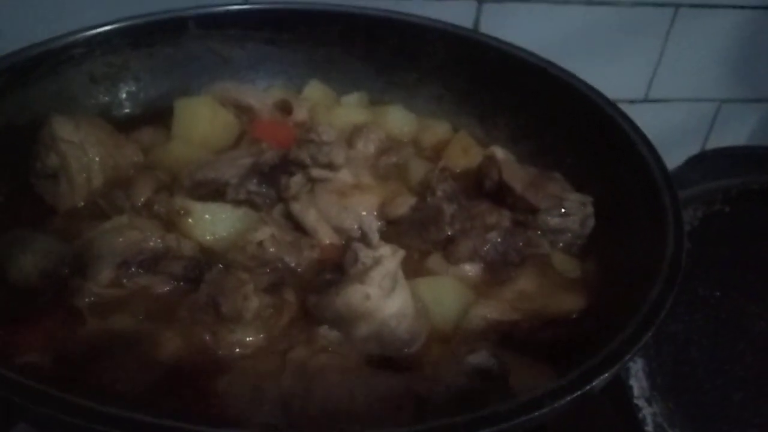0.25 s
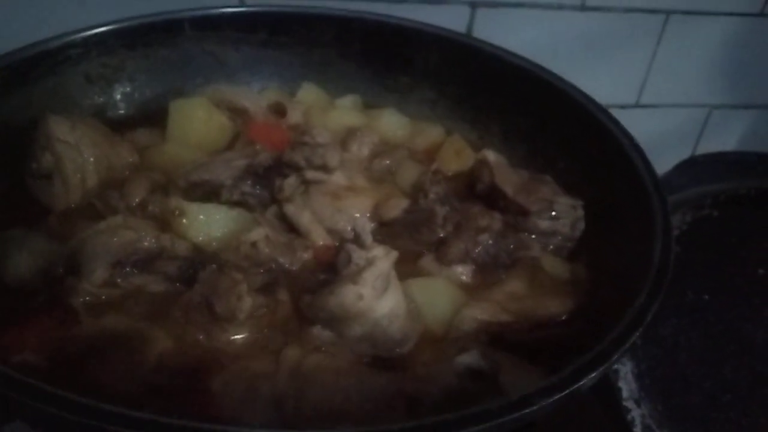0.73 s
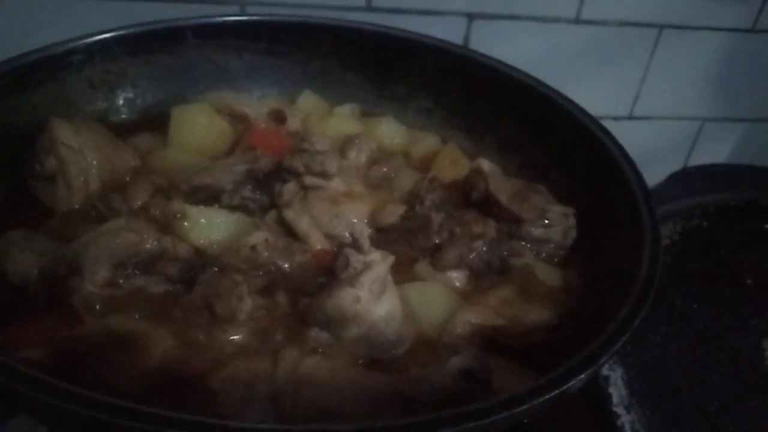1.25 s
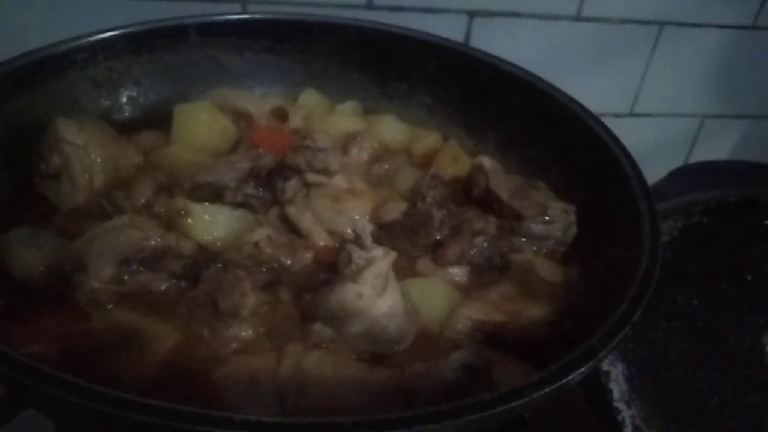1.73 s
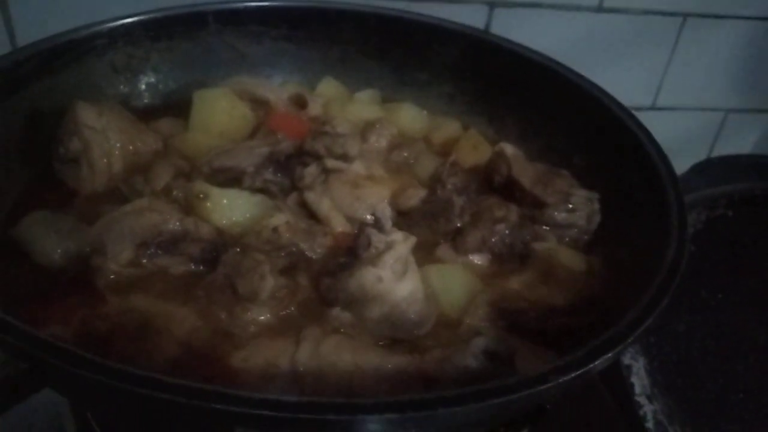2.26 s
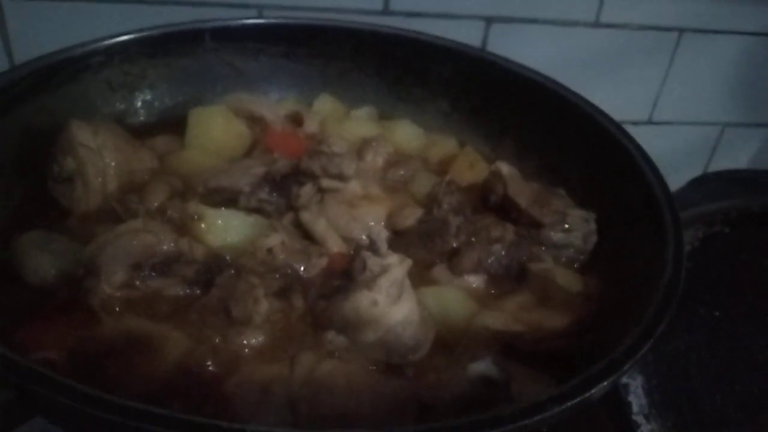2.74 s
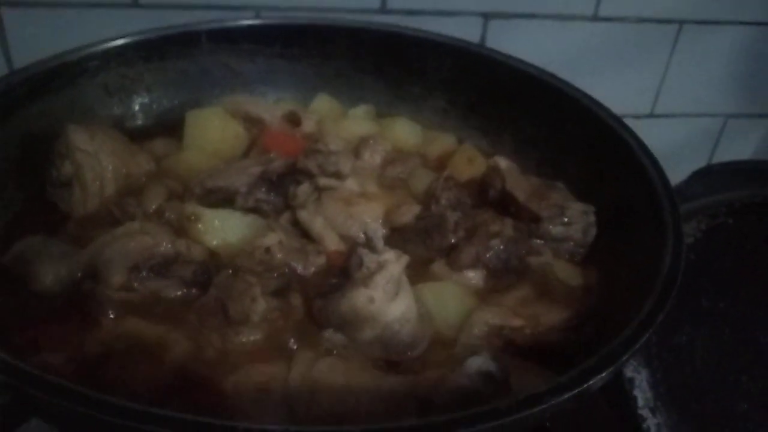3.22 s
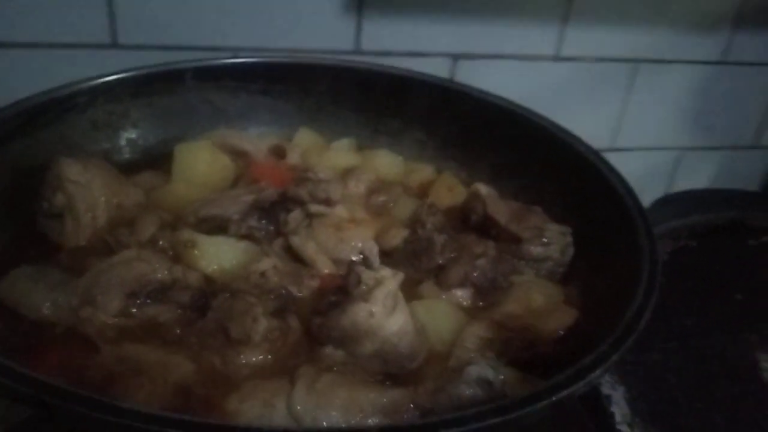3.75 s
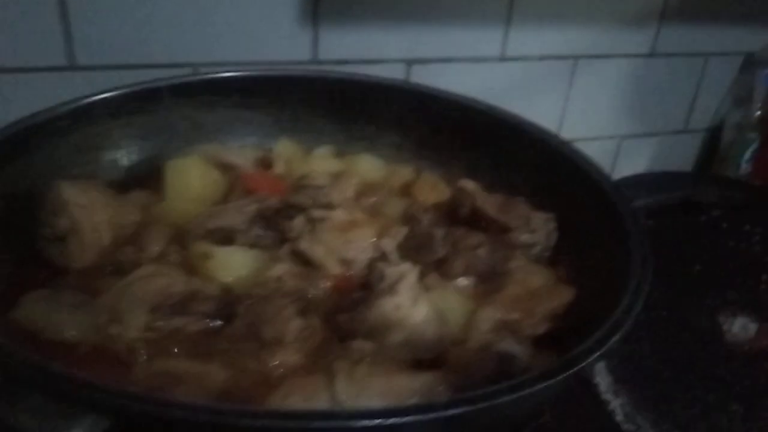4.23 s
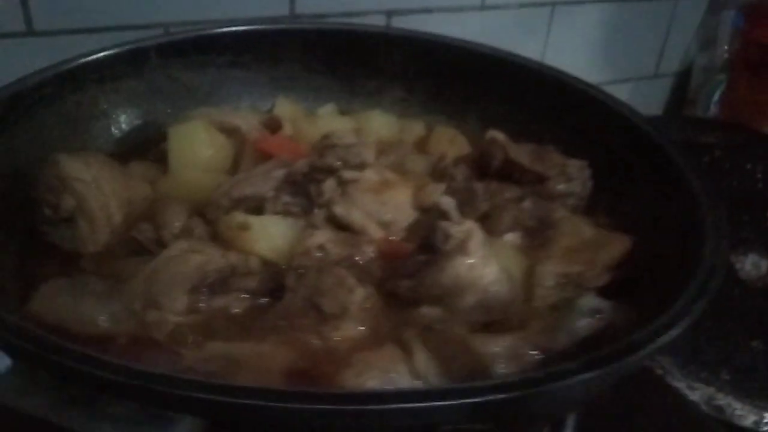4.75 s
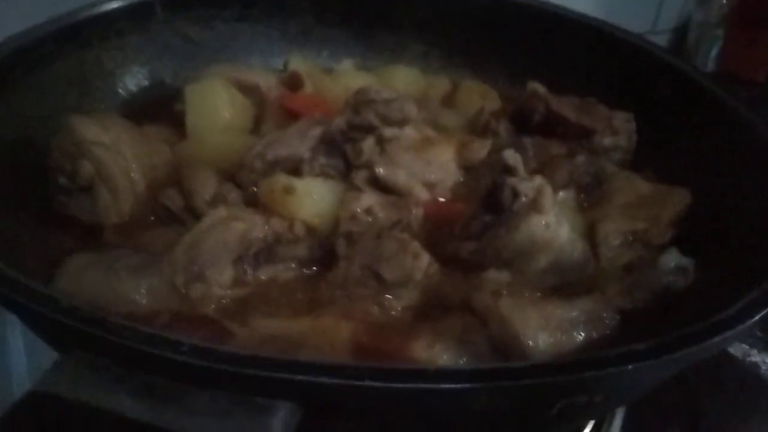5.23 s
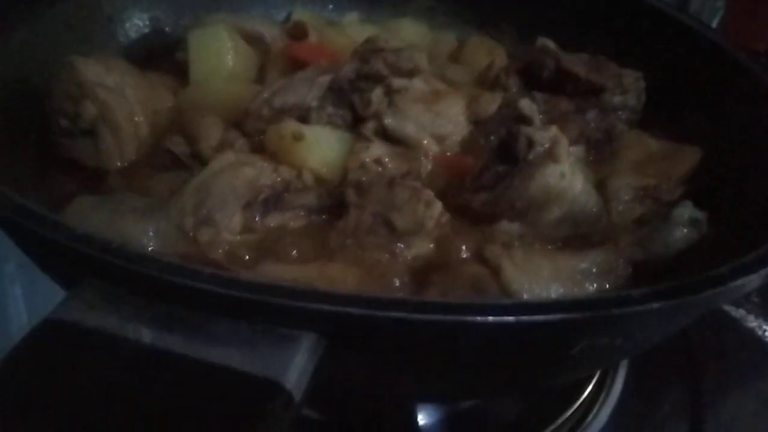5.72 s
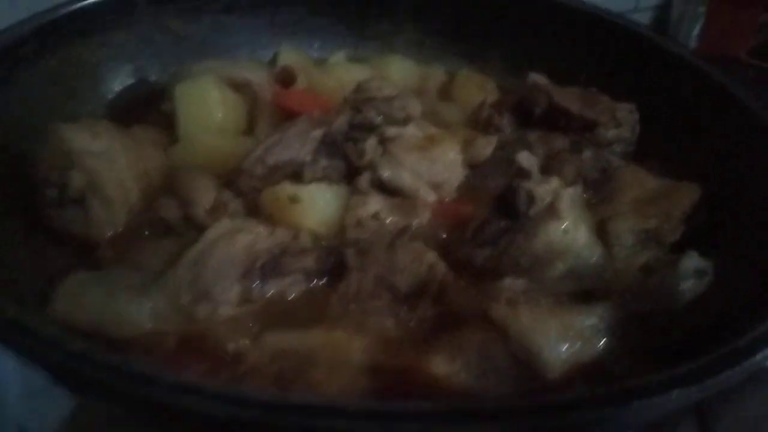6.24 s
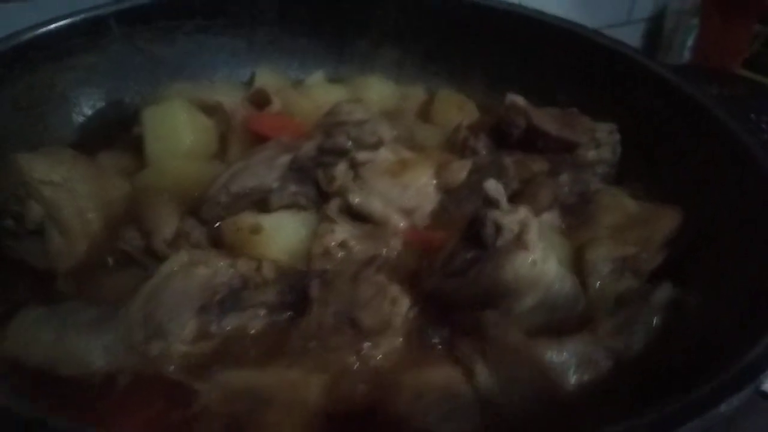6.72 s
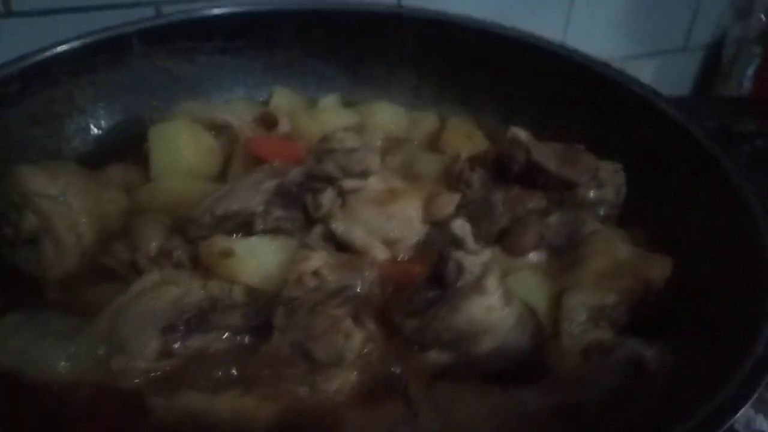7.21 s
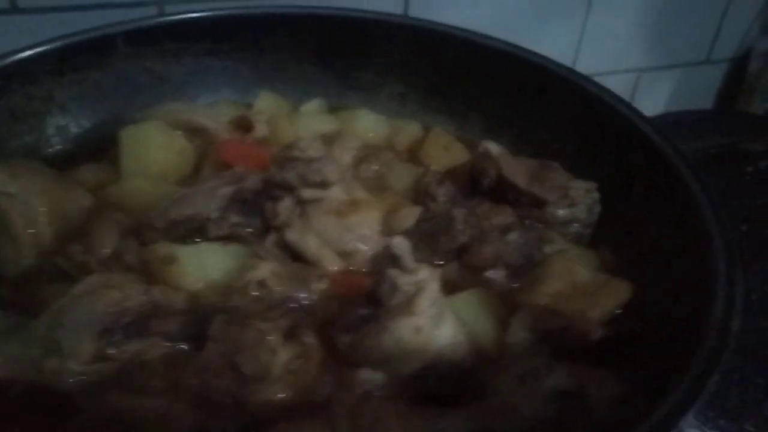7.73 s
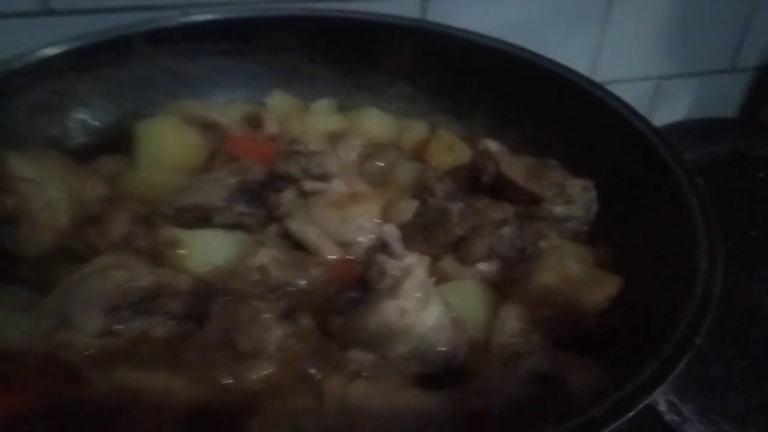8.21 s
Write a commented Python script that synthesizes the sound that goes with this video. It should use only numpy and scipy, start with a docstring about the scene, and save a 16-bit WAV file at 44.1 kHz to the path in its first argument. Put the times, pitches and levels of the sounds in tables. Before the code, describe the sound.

Close, crisp bubble pops and fine sizzling from a simmering stew; a wavering hum stops after one dry knock, and the popping grows busier.

```python
"""A stew simmers in a pan in a tiled kitchen, heard from close by.
From the start bubbles burst as short pitched pops, each with its froth, among random swarms and crackle.
A low hum wavers until just after a knock at about 2.4 s. Pops then come thicker and mostly louder.
Throughout, fat spits now and then, or sauce sizzles on the hot pan wall; late on, steam briefly whistles.
Pops are short swelling tones; hiss, hum, gurgles and whistles are shaped noise."""
import sys
import numpy as np
from scipy import signal
from scipy.fft import rfft, irfft, next_fast_len
from scipy.io import wavfile
from scipy.ndimage import uniform_filter1d

SR = 44100
rng = np.random.default_rng(int(sys.argv[2]) if len(sys.argv) > 2 else 0)


def store_wav(level_fs):
    """Save 16-bit WAV to argv[1]."""
    pcm = np.round(np.clip(np.atleast_2d(level_fs), -1, 1) * 32767)
    wavfile.write(sys.argv[1], SR, pcm.T.astype(np.int16))


N = 373527
TIME = np.arange(N) / SR  # seconds

# Bubbles that burst one by one. Each row: peak time in seconds, peak level in dB, pitch in Hz,
# time to swell to the peak in ms, froth level in dB relative to the pop before the froth's trim.
POPS = [(0.1056, -47, 735, 5.2, 0), (0.11, -47, 2310, 5.0, 5), (0.1187, -37.5, 3440, 1.2, -10),
        (0.1232, -34, 3400, 1.5, -0.5), (0.14, -36, 7800, 0.29, -13), (0.1667, -39.5, 1234, 0.94, 11),
        (0.188, -39, 1500, 2.3, -19), (0.2206, -38, 1440, 3.7, -4), (0.2555, -45.5, 1124, 11.8, 3.5),
        (0.2797, -37.5, 8940, 0.44, -3), (0.3345, -48, 1730, 5.5, 5.5), (0.3561, -37, 8300, 0.52, 3),
        (0.3762, -46, 3450, 5.8, -9), (0.435, -48, 3750, 4.7, -18), (0.499, -43, 3370, 3.3, -6),
        (0.6068, -51.5, 1104, 6.7, 1.5), (0.6266, -42.5, 3460, 4.3, -18), (0.667, -43.5, 2000, 1.97, -10),
        (0.7823, -43, 3450, 3.4, -2), (0.837, -37, 1490, 1.5, 4), (0.91, -42, 973, 3.6, -17),
        (0.9345, -44, 3420, 2.5, 4.5), (1.074, -47, 3520, 3.7, -12), (1.1183, -45.5, 1750, 3.4, 2.5),
        (1.1544, -49.5, 3240, 4.3, -17), (1.1687, -34.5, 9600, 0.4, 0), (1.18, -39, 3380, 3.1, -17),
        (1.2003, -38.5, 3470, 2.2, -20), (1.2477, -42, 3420, 2.6, -23), (1.319, -41.5, 3410, 2.5, -5),
        (1.3355, -48.5, 3630, 4.6, -9), (1.463, -48, 1610, 8.2, 1), (1.511, -42, 3440, 3.1, -8.5),
        (1.6393, -43, 1610, 7.1, -8), (1.782, -49.5, 1290, 3.7, 8), (1.831, -47.5, 1157, 6.7, -6),
        (1.8377, -39.5, 2170, 2.7, -3), (1.9147, -53, 1167, 6, -26), (1.9533, -40, 3550, 2.7, 7.5),
        (2.0369, -47.5, 1650, 6.3, -10), (2.0676, -39.5, 9700, 0.52, -3), (2.288, -48, 3500, 4.7, 3),
        (2.298, -39, 7700, 0.91, 8), (2.309, -41, 3470, 2.5, -20), (2.326, -44.5, 780, 3.8, -1),
        (2.329, -50, 1880, 4.8, 0.5), (2.399, -49, 4370, 4.6, -8), (2.5068, -36, 3470, 1.5, -1.5),
        (2.555, -42.5, 3560, 3.3, 6), (2.563, -46, 3640, 4.1, -3), (2.5796, -38.5, 4100, 1.56, 4),
        (2.766, -58, 1087, 7.9, -22), (2.804, -45, 3440, 3.7, -4), (2.833, -47.5, 4460, 3, 4),
        (2.852, -43.5, 7350, 0.81, 11.5), (2.873, -41, 7700, 0.35, -11), (2.907, -51, 2950, 5.2, -3),
        (2.955, -34, 1647, 4.4, -7), (2.9946, -38, 3150, 1.3, 11.5), (3.046, -31, 4040, 1.0, 5),
        (3.0598, -36, 3590, 2.2, 5.5), (3.0632, -31.5, 6650, 0.4, 7.5), (3.1166, -35.5, 5750, 0.6, -4),
        (3.1223, -36, 5150, 0.37, -2), (3.153, -34, 7830, 1.1, -18), (3.2, -40, 7700, 1.6, -9),
        (3.223, -51, 3400, 2.1, 6), (3.266, -52, 1560, 3, -22), (3.3104, -40.5, 9600, 0.8, -14),
        (3.3554, -44.5, 3370, 11, -2), (3.3581, -37.5, 3420, 0.8, -14), (3.451, -37.5, 3430, 1.6, 2),
        (3.4600, -24, 4290, 0.95, -0.5), (3.558, -38.5, 3240, 2, -18), (3.5873, -44.5, 3220, 4.1, -21),
        (3.674, -51, 1754, 4.9, 9), (3.7092, -34.5, 3610, 1.54, 5), (3.745, -38, 3530, 1.4, 5.5),
        (3.7516, -36.5, 1337, 3.5, -1.5), (3.799, -41, 1536, 3.6, -24), (3.878, -32, 9700, 0.44, -8),
        (3.8815, -48.5, 2240, 7.8, -3.5), (3.9258, -41, 8950, 0.7, -17), (3.9692, -37.5, 9000, 0.29, 3),
        (3.99, -58.5, 1080, 5.7, -6), (4.0868, -46.5, 3790, 3.3, -16), (4.109, -52, 1610, 7.7, -1),
        (4.1657, -40.5, 4040, 2.2, 0), (4.1865, -37, 3930, 3.5, -3), (4.2414, -39.5, 3520, 2.8, -9),
        (4.2548, -40, 4030, 2.4, -9), (4.2642, -31.5, 3730, 1.57, -17), (4.273, -29, 1584, 3.76, -25),
        (4.2878, -40, 3640, 2.1, -4), (4.2965, -37, 3860, 1.1, 6.5), (4.3597, -39.5, 3950, 1.4, 5),
        (4.397, -35.5, 3450, 1.6, -3), (4.3998, -36.5, 4360, 0.7, 10), (4.4204, -40, 2240, 4.4, -6),
        (4.4279, -36, 2030, 2.4, -1), (4.4356, -31, 2970, 0.57, -13), (4.4405, -29.5, 3920, 1.11, -4),
        (4.453, -36.5, 3710, 3.3, -8), (4.4917, -39, 3620, 2.8, -27), (4.5647, -35, 3900, 1.4, -7),
        (4.614, -32, 3030, 0.69, 0), (4.657, -39, 3520, 5.4, -1), (4.6671, -36.5, 3900, 1.1, -15),
        (4.682, -44.5, 1880, 2.1, 6.5), (4.702, -38.5, 1875, 1.2, 4), (4.7042, -37, 3440, 5.1, -8),
        (4.7095, -34, 3650, 1.35, -12), (4.746, -37.5, 3490, 3.4, -8), (4.761, -39, 3260, 1.6, 4),
        (4.813, -43.5, 3940, 2.2, -6), (4.82, -48, 1694, 6.5, 0), (4.8692, -38.5, 1796, 3.7, -24),
        (4.878, -30, 3410, 0.68, -9), (4.8932, -34.5, 3800, 1.4, -7), (4.943, -47, 4000, 2.1, 0),
        (4.9937, -38.5, 1940, 2.5, -7), (5.008, -36, 2270, 1.36, -2), (5.0174, -40.5, 4830, 2.5, 8),
        (5.0447, -33.5, 2110, 1.23, -22), (5.0473, -29.5, 2090, 1.75, -14), (5.0839, -35.5, 3180, 1.3, -4),
        (5.132, -35.5, 4380, 1.2, 3), (5.147, -34, 4900, 0.66, -11), (5.1562, -38.5, 3900, 2, -15),
        (5.182, -37, 3480, 1.3, -3), (5.1855, -32, 4120, 1.3, 1), (5.189, -24.5, 5040, 0.29, -9),
        (5.211, -36, 4430, 2, -8), (5.228, -35, 6860, 0.5, -19), (5.2702, -30, 6760, 0.84, -28),
        (5.2786, -35, 6070, 0.55, -8), (5.305, -49.5, 2670, 3.8, -7), (5.3078, -28.5, 7030, 0.93, -30),
        (5.34, -39, 5900, 1.4, -8), (5.365, -46.5, 2970, 3.8, -12), (5.3739, -35, 5970, 0.44, -3),
        (5.3794, -39.5, 5200, 0.8, -12), (5.466, -30, 4340, 0.39, 10.5), (5.503, -38.5, 1770, 2.6, 2),
        (5.5831, -29, 3990, 1.0, -1), (5.604, -25.5, 4350, 0.52, -4), (5.638, -36, 5630, 0.27, -6),
        (5.6647, -36.5, 1600, 0.64, -6), (5.685, -31, 2020, 2.0, -5.5), (5.758, -37, 3500, 2.1, -4),
        (5.8109, -38.5, 3660, 5.3, 1), (5.8494, -38, 6200, 1.1, -3), (5.856, -36, 5470, 0.63, 12.5),
        (5.8763, -32, 7100, 0.6, -10), (5.8829, -36, 6940, 0.5, -7), (5.888, -31, 7800, 0.31, -11),
        (5.8992, -33, 6440, 0.39, -1), (5.931, -37.5, 6540, 0.7, 2), (5.965, -40.5, 3730, 2.1, 6.5),
        (5.989, -33.5, 5600, 0.47, 5), (6.0192, -37, 3970, 0.9, 8.5), (6.0286, -37, 4150, 1.07, 14.5),
        (6.1279, -35, 5250, 0.35, 10), (6.1355, -35, 4210, 1.2, -1), (6.1377, -48, 1300, 9.4, -0.5),
        (6.145, -30, 4650, 0.8, 5), (6.149, -31.5, 3520, 1.9, -5), (6.1656, -30, 3680, 1.5, -6),
        (6.1808, -35, 3260, 2.04, -23), (6.1904, -34, 5350, 0.5, -11), (6.2015, -31, 7100, 0.57, -13),
        (6.218, -35.5, 4800, 0.4, -10), (6.2443, -40.5, 3700, 3.3, 0), (6.273, -33, 7300, 0.5, -10),
        (6.2761, -43, 1327, 4.5, -5), (6.2805, -25.5, 7200, 0.7, -6), (6.2867, -37, 3590, 2.5, 0.5),
        (6.3038, -31, 6900, 0.34, -10), (6.323, -31, 9400, 0.21, -2), (6.348, -39, 5700, 0.27, 2),
        (6.3656, -37, 5400, 0.9, -2), (6.3919, -41, 4670, 1.2, 0), (6.4033, -33, 4250, 0.36, 5),
        (6.427, -37, 7270, 0.85, -9), (6.429, -41.5, 3370, 3.8, 10.5), (6.4443, -32, 3430, 1.1, -2),
        (6.4682, -42, 3770, 0.61, -7), (6.5425, -37.5, 1514, 4, -3), (6.578, -39, 1630, 2.4, -12),
        (6.6384, -40, 3640, 2.4, 0), (6.6583, -26.5, 5060, 0.6, -2), (6.6662, -54, 922, 18, -3),
        (6.6766, -37, 8000, 0.98, 3), (6.6812, -49, 1544, 8.3, 8), (6.6853, -42, 790, 2, -6),
        (6.699, -39.5, 756, 2.6, 0.5), (6.7068, -29.5, 5370, 0.67, -16), (6.7412, -39, 4100, 1.4, -1),
        (6.7778, -33.5, 4670, 1.1, -2), (6.7899, -33.5, 3800, 1.26, -10), (6.7955, -34, 3760, 1.1, -6),
        (6.818, -33, 4900, 0.68, -21), (6.8664, -39, 3410, 2.8, -22), (6.8785, -43, 4120, 0.85, -13),
        (6.8935, -34, 5050, 0.3, 5), (6.9, -30, 3580, 1.1, -7), (6.9094, -38, 1245, 3.3, 3),
        (6.946, -39, 4330, 1.85, 1), (6.986, -47, 1255, 7, -18), (6.9931, -37, 4050, 0.9, 3),
        (7, -33.5, 3850, 1.5, -5), (7.0128, -33.5, 3520, 2.5, -11), (7.039, -33, 3800, 0.9, -8),
        (7.052, -35, 4100, 0.83, -19), (7.0847, -33.5, 2000, 1.13, -5), (7.0853, -24.5, 4170, 0.81, -3),
        (7.1084, -53, 1036, 19.6, -1), (7.1159, -33.5, 6570, 0.48, 0), (7.1345, -36.5, 4400, 0.9, -8),
        (7.167, -37.5, 4330, 1.2, -2), (7.2332, -31.5, 3730, 1.1, 1), (7.272, -33.5, 4000, 1.0, -49),
        (7.2975, -48.5, 860, 6.3, -19), (7.389, -37.5, 3500, 1.6, -1), (7.3992, -36, 3540, 1.0, -9),
        (7.4482, -33, 5200, 0.66, 7.5), (7.4807, -31.5, 1450, 1.5, -8), (7.505, -33, 7000, 1.2, 9.5),
        (7.565, -37, 4280, 0.32, -8), (7.5768, -37, 3380, 3.8, -8), (7.5944, -33, 6200, 0.78, -10),
        (7.6676, -32.5, 3340, 1.7, -0.5), (7.675, -34, 4130, 0.8, -9), (7.688, -27, 5640, 0.34, -2),
        (7.6935, -34, 5670, 0.38, -13), (7.7297, -46.5, 1620, 3.9, 0.5), (7.7484, -33, 4630, 0.53, -3),
        (7.815, -43, 2028, 2.5, 4), (7.9523, -43, 3465, 6.7, 3), (7.9941, -34, 5200, 0.45, 2),
        (8.0013, -36, 3470, 3, -17), (8.058, -46, 3570, 3, -3), (8.0789, -31.5, 3560, 1.5, -5),
        (8.1121, -41, 3510, 2, -23), (8.1255, -31, 3500, 2, -19), (8.1316, -30, 3430, 1.5, -24),
        (8.1656, -35.5, 3450, 3.8, -13), (8.191, -42, 3480, 2.5, -9), (8.2882, -34, 4100, 0.9, -10),
        (8.2953, -34, 3350, 2.5, -8), (8.3019, -30, 4670, 0.36, 0), (8.303, -46, 1960, 2.7, -13),
        (8.351, -40, 3340, 2, -6), (8.371, -43, 2400, 2.2, -1), (8.3748, -32.5, 3150, 1.5, -11),
        (8.3793, -30.5, 3900, 0.52, -14), (8.445, -36, 3330, 2, -12)]
# Spits of fat. Each row: start in seconds, length in seconds, level in dB before a trim, middle pitch in Hz.
SPITS = [(0.077, 0.074, -53, 7700), (0.246, 0.046, -56.5, 7900), (0.452, 0.039, -54, 8150),
         (0.684, 0.034, -62.5, 7700), (1.013, 0.021, -51, 8750), (1.514, 0.012, -53, 7800),
         (1.574, 0.13, -51, 8030), (1.601, 0.055, -55.5, 4460), (1.969, 0.017, -56.5, 8200),
         (2.139, 0.027, -50.5, 7600), (2.662, 0.035, -58, 7900), (2.892, 0.036, -57, 7700),
         (3.595, 0.043, -54.5, 7450), (4.627, 0.027, -57, 9000), (4.869, 0.034, -55.5, 7600),
         (5.188, 0.1, -50, 6800), (5.795, 0.061, -46, 7330), (6.033, .11, -50.5, 6000),
         (6.526, 0.058, -56.5, 7200), (8.056, 0.023, -58, 7150), (8.197, 0.018, -59.5, 6500),
         (8.287, 0.15, -55.5, 5940)]
# Slow activity of the small bubbles. Each row: time in seconds, level in dB before each sound's own trim.
SMALL_ACTIVITY = [(0.0, -58.5), (1.4, -65.5), (1.65, -52), (2.0, -60.5), (2.75, -62), (3.0, -49),
                  (3.6, -55), (4.1, -59), (4.4, -55), (5.2, -47.5), (6.2, -50.5), (7.6, -45.5), (7.9, -49),
                  (8.4, -48)]
# The same for the tiny bubbles. Each row: time in seconds, level in dB before each sound's own trim.
TINY_ACTIVITY = [(0.0, -66), (0.4, -64), (0.85, -64.5), (1.6, -68), (2.55, -69), (3.1, -47), (3.55, -66.5),
                 (3.95, -52), (4.2, -78.5), (4.8, -66.5), (5.9, -58), (6.6, -63.5), (7.2, -65.5),
                 (7.6, -48.5), (8.3, -67)]


def amp(db):
    """Turns decibels into a gain."""
    return 10 ** (np.asarray(db) / 20)


def evened(x):
    """Scales a sound to an rms level of 1."""
    return x / np.sqrt(np.mean(x ** 2) + 1e-30)


def read(points, hz):
    """Reads a table of values by pitch, with straight lines between its points on a log-pitch axis."""
    f, value = np.transpose(points)
    return np.interp(np.log(hz + 1), np.log(f + 1), value)


def follow(curve):
    """Turns a level curve into a gain for every sample."""
    return amp(np.interp(TIME, *np.transpose(curve)))


def add(mix, s, sound):
    """Mixes a sound in at time s in seconds."""
    part = mix[max(round(s * SR), 0):][:len(sound)]
    part += sound[:len(part)]


def tinted(x, spectrum):
    """Gives a sound a colour, keeping the power of white noise."""
    size = next_fast_len(N)
    colour = evened(amp(read(spectrum, np.fft.rfftfreq(size, 1 / SR))))
    return irfft(rfft(x, size) * colour, size)[:N]


def noise(spectrum):
    """Makes steady noise of a given colour, rms 1."""
    return evened(tinted(rng.standard_normal(N), spectrum))


def wavering(hz, width_hz, size):
    """An unsteady tone: noise in one narrow band, rms 1."""
    f = np.fft.rfftfreq(size, 1 / SR)
    band = np.exp(-2 * ((f - hz) / width_hz) ** 2)
    return evened(irfft(rfft(rng.standard_normal(size)) * band, size))


def surge(t, rise, decay, steepening=1):
    """Smooth rise to a peak at t = 0, then a fall: exponential, or ever faster if steepening is above 1."""
    before, after = np.minimum(t, 0), np.maximum(t, 0)
    return np.exp(-.5 * (before / rise) ** 2 - (after / decay) ** steepening)


def bubble(hz, swell_ms, glide):
    """The film opens and the cavity rings; a positive glide lifts the pitch as the hole widens."""
    swell = swell_ms / 1000
    u = np.arange(int(4.5 * swell * SR) + 2) / (swell * SR)  # time in swells: the peak is at 1
    turns = hz * swell * (u + glide * (u - 1) ** 2 / 2)
    envelope = (u * np.exp(1 - u)) ** 6
    return envelope * np.sin(2 * np.pi * (turns + rng.random()))


def bunch(waits, hz, octaves, spread_db, cycles):
    """Bubbles of like size burst after the given waits, the odd-sized ones tending weaker; total energy 1."""
    # The pitches that the pan favours. Each row: pitch in Hz, relative level in dB.
    favoured = [(500, -17), (1100, 3), (1350, -6.5), (1600, 22.5), (1900, -9.5), (2200, 14), (2700, -4),
                (3450, 4), (4300, 8), (5800, 1), (7600, -4.5), (9700, -3.5), (12000, -23)]
    out = np.zeros(int((waits.max() + .06) * SR))
    for wait, (size, strength, length) in zip(waits, rng.standard_normal((len(waits), 3))):
        pitch = hz * 2 ** (octaves * size * abs(size) / 2)
        db = spread_db * strength - 2 * size ** 2 + read(favoured, pitch)
        swell_ms = 1000 * cycles * np.exp(.4 * length) / pitch
        add(out, wait, amp(db) * bubble(pitch, swell_ms, 0))
    return out / np.linalg.norm(out)


def pan_echoes(x, decay_s, size=2048):
    """Quick reflections from the pan wall and the food; they change as the bubbling moves from spot to spot."""
    t, out = np.arange(size // 2) / SR, np.zeros(N)
    window = np.sin(np.pi * np.arange(size) / size)
    for i in range(0, N - size, size // 2):
        # sparse clicks of random sign, fading with time
        taps = rng.choice([-1., 1.], len(t)) * (rng.random(len(t)) < .1)
        taps *= (t > .0012) * np.exp(-t / decay_s)
        add(out, i / SR, signal.fftconvolve(x[i:i + size] * window, taps / np.linalg.norm(taps)))
    return out


def kitchen(x, pan_db, room_db, pan_decay=0.0035, size=22050):
    """Adds quick reflections in the pan, then the tail of the tiled room, which fades at its own pace by pitch."""
    # Ring of the kitchen. Each row: pitch in Hz, time to fade by 60 dB in seconds.
    fade_times = [(200, 0.3), (1000, 0.29), (2200, 0.34), (4000, 0.086), (8000, 0.24), (14000, 0.24)]
    taps = rng.choice([-1., 1.], size) * (rng.random(size) < .1) * (np.arange(size) / SR > .0015)
    hz, frame_s, z = signal.stft(taps, SR, nperseg=256)
    fade = amp(-60 * frame_s / read(fade_times, hz)[:, None])
    tail = signal.istft(z * fade, SR, nperseg=256)[1][:size]
    room = signal.oaconvolve(x, tail / np.linalg.norm(tail))[:N]
    return x + amp(pan_db) * pan_echoes(x, pan_decay) + amp(room_db) * room


def still_air(level_db=-74):
    """The still air of the kitchen: faint, steady coloured noise."""
    # Each row: pitch in Hz, relative level in dB.
    air_colour = [(20, -14.5), (60, 0), (130, 8), (200, -3.5), (350, -5), (700, -17.5), (2000, -19.5),
                  (6000, -52), (10000, -22.5), (12500, -42.5), (15500, -39)]
    return amp(level_db) * noise(air_colour)


def hum(level_db=0.5, size=131072):
    """A low, beating hum: several narrow bands of noise that waver in level, fade and stop."""
    # Strength. Each row: time in seconds, level in dB before the trim.
    strength = [(0.0, -39.5), (0.47, -40.5), (0.54, -38), (0.84, -41), (1.05, -51), (1.13, -41),
                (1.23, -49), (1.36, -45), (1.55, -56), (1.68, -46.5), (1.83, -65), (1.95, -42), (2.22, -53),
                (2.33, -66), (2.45, -49), (2.53, -67), (2.63, -67)]
    # Each row: pitch in Hz, width in Hz, relative level in dB.
    bands = [(69.37, 3.5, -8.5), (101.7, 10.5, 2), (109.7, 57, -5.5), (135, 13.4, -1.5), (170.6, 17, -14),
             (185, 85, -22.5), (34.7, 33, -20)]
    tone = sum(amp(db) * wavering(hz, width_hz, size) for hz, width_hz, db in bands)
    tone /= np.sqrt(uniform_filter1d(tone ** 2, size=4400))  # evens the power over 0.1 s
    out = np.zeros(N)
    add(out, 0, tone)
    fade_out = np.clip((strength[-1][0] - TIME) * 10, 0, 1)
    return amp(level_db) * out * follow(strength) * fade_out


def knock(knock_s=2.3704):
    """A dry knock with a low shudder after it: four short rings, the lower ones later."""
    # Each row: pitch in Hz, peak level in dB, time to swell in ms, delay of the peak in seconds.
    rings = [(844, -20.5, 1.34, 0.0012), (263, -33.5, 3.9, 0.00514), (194, -54, 9.7, 0.031),
             (104, -42, 19, 0.0625)]
    out = np.zeros(N)
    for hz, db, swell_ms, delay in rings:
        add(out, knock_s + delay - swell_ms / 1000, amp(db) * bubble(hz, swell_ms, 0))
    return out


def steam_tones(rows, size=32768):
    """Steam forced through a pocket or gap sounds its resonance for a moment."""
    out, t = np.zeros(N), (np.arange(size) - size // 6) / SR
    for s, db, hz, width_hz, rise, decay in rows:
        flow = surge(t, rise, decay)
        tone = evened(flow * wavering(hz, width_hz, size))
        add(out, s + t[0], amp(db) * tone * np.sqrt(np.mean(flow ** 2)))
    return out


def gurgles():
    """Gurgles deep in the sauce: short surges of steam, each in a broad band."""
    # Each row: peak time in seconds, level in dB, pitch in Hz, width in Hz, rise and decay in seconds.
    gurgle_rows = [(.34, -67, 280, 120, 0.027, 0.072), (.64, -57.5, 370, 110, 0.059, 0.095),
                   (.78, -58.5, 386, 114, 0.078, 0.047), (1.12, -62.5, 325, 102, 0.03, 0.058),
                   (4.30, -53.5, 380, 220, 0.0062, 0.051), (4.39, -60, 477, 206, 0.011, 0.018),
                   (4.76, -57, 168, 52, 0.022, 0.045), (5.20, -67, 745, 303, 0.039, 0.046),
                   (6.69, -56, 460, 149, 0.025, 0.059), (7.30, -66, 740, 297, 0.0039, 0.027),
                   (7.325, -60, 430, 207, 0.021, 0.029), (.85, -56.5, 1090, 390, 0.023, 0.064),
                   (3.16, -65, 1120, 150, 0.0083, 0.013), (4.29, -64, 1160, 250, 0.016, 0.042),
                   (6.92, -61, 720, 292, 0.0084, 0.029), (7.475, -54.5, 1380, 605, 0.015, 0.023),
                   (3.26, -67, 1550, 196, 0.097, 0.27), (8.01, -61, 764, 338, 0.0057, 0.031),
                   (8.22, -65, 940, 403, 0.0099, 0.036)]
    return steam_tones(gurgle_rows)


def whistles():
    """Steam whistles through a gap in the food: short surges, each in a narrow band."""
    # Each row: peak time in seconds, level in dB, pitch in Hz, width in Hz, rise and decay in seconds.
    whistle_rows = [(5.695, -50, 3000, 130, .016, .07), (5.73, -53.5, 3410, 150, .025, .09),
                    (5.81, -51, 2980, 110, .035, .055)]
    return steam_tones(whistle_rows)


def droplets(flow, per_s, merge_db):
    """Droplets flash to steam at random: separate crackles in a weak flow, merging to a hiss in a strong one."""
    chance = np.clip(per_s / SR * (1 + (flow / amp(merge_db)) ** 2), 0, 1)
    return flow * rng.standard_normal(N) * (rng.random(N) < chance) / np.sqrt(chance)


def sizzles(spray_db=34.5, spray_lag=0.018, per_s=1100, merge_db=-53, drying=1.4,
            splutter_per_s=350, splutter_merge_db=-47):
    """Steam hisses off the pan wall while the sauce splutters; strong bursts throw a fine spray."""
    # Sauce flashing to steam. Each row: peak time in seconds, level in dB, rise and decay in seconds,
    # splutter level in dB relative to the hiss.
    bursts = [(1.61, -61, 0.03, 0.098, -21), (3.041, -44.5, 0.051, 0.068, -46),
              (3.886, -50.5, 0.012, 0.0079, -33), (5.564, -44, 0.047, 0.089, -5),
              (6.121, -52.5, 0.02, 0.073, -19.5), (6.68, -52, 0.024, 0.025, 1),
              (7.506, -44.5, 0.028, 0.1, -30)]
    # Colours of the hiss, the splutter and the spray. Each row: pitch in Hz, relative level in dB.
    hiss_colour = [(1500, -36), (2700, -1), (3500, -12.5), (4800, 5.5), (6200, 1), (7800, 9.5),
                   (9200, -3.5), (11000, -9.5), (13000, -35)]
    splutter_colour = [(150, -65), (350, -3.5), (700, 10.5), (1300, 7.5), (2100, 13), (2700, -9),
                       (4000, -57)]
    spray_colour = [(6000, -34), (9000, 18.5), (11000, 6), (13000, 3), (15500, -8)]
    hiss, splutter, spray = np.zeros(N), np.zeros(N), np.zeros(N)
    for s, db, rise, decay, splutter_db in bursts:
        flow = amp(db) * surge(TIME - s, rise, decay, drying)
        hiss += flow
        splutter += flow * amp(splutter_db)
        # the spray grows as the square of the flow, and comes a moment later
        late_flow = amp(db) * surge(TIME - s - spray_lag, rise, decay, drying)
        spray += amp(spray_db) * late_flow ** 2
    steam = tinted(droplets(hiss, per_s, merge_db), hiss_colour)
    drops = tinted(droplets(splutter, splutter_per_s, splutter_merge_db), splutter_colour)
    return steam + drops + spray * noise(spray_colour)


def crackle(per_s=190, spread_db=4.5, clump_db=5.5, drift=.04, count=90, fine_hz=6300):
    """Films too thin to sing tear all the time; each tick rings the hollows, whose pitch drifts as the sauce heaves."""
    # Hollows between pieces of food. Each row: middle pitch in Hz, width in Hz,
    # level in dB relative to the bubble activity, steady level in dB.
    hollows = [(1125, 92, -36.5, -89.5), (1620, 77, -39.5, -86), (2237, 120, -30.5, -85.5),
               (3479, 207, -18, -76), (4430, 290, -20, -90), (5560, 350, -23.5, -106),
               (7550, 500, -18, -88), (9800, 480, -25.5, -101)]
    clumps = evened(uniform_filter1d(rng.standard_normal(N), size=500))
    tick_db = spread_db * np.minimum(rng.exponential(1, N), 3) + clump_db * clumps
    ticks = (rng.random(N) < per_s / SR) * amp(tick_db)
    ticks /= np.sqrt(uniform_filter1d(ticks ** 2, size=5000) + .2 * np.mean(ticks ** 2))
    out = np.zeros(N)
    t = np.arange(1400) / SR
    for hz, width_hz, db, steady_db in hollows:
        wander = np.interp(TIME, np.linspace(0, TIME[-1], count), rng.standard_normal(count))
        pitch = hz * (1 + drift * wander)
        ring = signal.oaconvolve(ticks * rng.standard_normal(N), t * np.exp(-np.pi * width_hz * t))[:N]
        rung = evened(ring * np.sin(2 * np.pi * np.cumsum(pitch) / SR))
        activity = follow(TINY_ACTIVITY if hz > fine_hz else SMALL_ACTIVITY)
        out += rung * np.hypot(amp(db) * activity, amp(steady_db))
    return out


def swarm(activity, pitches, per_s, cycles, patchy_db, level_db, count=32):
    """Bubbles of many sizes burst at random; those of one size go off in bunches."""
    hz = np.geomspace(pitches[0][0], pitches[-1][0], count)
    n = int(per_s * N / SR)
    at, kind = rng.integers(0, N, n), rng.integers(0, count, n)
    # a random strength for each size and moment, smoothed over neighbouring sizes and over time
    bunches = rng.standard_normal((count, N // 512 + 1))
    bunches = uniform_filter1d(bunches, size=9, axis=0, mode="wrap")
    bunches = evened(uniform_filter1d(bunches, size=6, axis=1))
    size_db = 5 * np.minimum(rng.exponential(1, n), 2.5) + patchy_db * bunches[kind, at // 512]
    shapes = []
    for f in hz:
        swell_ms = 1000 * cycles / f * 2 ** rng.uniform(-.8, .6)
        shapes.append(amp(read(pitches, f)) * bubble(f, swell_ms, .01))
    out = np.zeros(N)
    for i, k, gain in zip(at, kind, amp(size_db)):
        add(out, i / SR, gain * shapes[k])
    # the heat supplies steam steadily, so a swarm's power evens out over about a tenth of a second
    power = uniform_filter1d(uniform_filter1d(out ** 2, size=3600), size=1500) + .1 * np.mean(out ** 2)
    return amp(level_db) * follow(activity) * out / np.sqrt(power)


def large_bubbles():
    """The swarm of large, low-pitched bubbles."""
    # Each row: time in seconds, level in dB before the trim.
    large_activity = [(0.0, -56), (0.3, -50), (0.9, -54), (1.3, -70.5), (1.8, -60.5), (2.7, -66),
                      (3.2, -59.5), (4.1, -73), (4.75, -58), (5.4, -65), (5.6, -42), (5.95, -71),
                      (6.9, -58.5), (7.3, -79), (8.3, -56)]
    # Each row: pitch in Hz, relative level in dB.
    large_pitches = [(500, -16), (750, -2), (1100, 2), (1600, -0.5), (2150, 14), (2600, 0.5)]
    return swarm(large_activity, large_pitches, per_s=200, cycles=3.75, patchy_db=12.0, level_db=-11.0)


def small_bubbles():
    """The swarm of small bubbles of middling pitch."""
    # Each row: pitch in Hz, relative level in dB.
    small_pitches = [(2800, -49), (3150, -22), (3500, 10), (4300, 0), (5000, 2), (5800, 0)]
    return swarm(SMALL_ACTIVITY, small_pitches, per_s=200, cycles=4.8, patchy_db=10.5, level_db=-14.5)


def tiny_bubbles():
    """The swarm of tiny, high-pitched bubbles."""
    # Each row: pitch in Hz, relative level in dB.
    tiny_pitches = [(5800, 17), (6500, 1.5), (7600, 12.5), (8600, -31), (10000, 25), (11500, -23)]
    return swarm(TINY_ACTIVITY, tiny_pitches, per_s=130, cycles=4.7, patchy_db=12.0, level_db=-9.5)


def gulps(lull_db=-8, rise_s=0.0071, decay_s=0.051, size=16384):
    """Steam comes up in gulps: a gain that is high around each pop and spit, with lulls between."""
    near = np.zeros(N + size)
    shape = surge((np.arange(size) - size // 4) / SR, rise_s, decay_s)
    for s, *_ in POPS + SPITS:
        add(near, s, shape ** 2)
    crowd = np.tanh(2 * near[size // 4:][:N])  # the shift puts each peak on its event
    return np.hypot(amp(lull_db), np.sqrt(crowd))


def spits(level_db=-8.5, octaves=0.13, spread_db=8.0, cycles=3.36, count=16):
    """Fat spits a short run of tiny, crisp bubbles."""
    out = np.zeros(N)
    for s, length, db, hz in SPITS:
        waits = length * (np.arange(count) + rng.random(count)) / count
        strength = amp(db + level_db) * np.sqrt(length * SR)
        add(out, s, strength * bunch(waits, hz, octaves, spread_db, cycles))
    return out


def froth(level_db=-7.0, count=11, delay_s=0.001002, wait_s=.02, octaves=0.205, spread_db=5, cycles=4.77):
    """Each pop sets off the froth around it: a bunch of bubbles that thins out quickly."""
    out = np.zeros(N)
    for s, db, hz, swell_ms, froth_db in POPS:
        # many short waits and a few long ones
        waits = -wait_s * np.log(1 - (np.arange(count) + rng.random(count)) / (count + 1))
        strength = amp(db + froth_db + level_db) * np.linalg.norm(bubble(hz, swell_ms, 0))
        add(out, s + delay_s, strength * bunch(waits, hz, octaves, spread_db, cycles))
    return out


def pops(glide=0.011, glide_spread=0.013, snap_db=-23, snap_cycles=1.6, twin_db=-13, twin_octaves=0.11):
    """The film tears with a faint snap and the cavity rings, bending up or down; a weaker near-twin follows."""
    out = np.zeros(N)
    variations = rng.uniform(-1, 1, (len(POPS), 3))
    for (s, db, hz, swell_ms, _), (bend, detune, lag) in zip(POPS, variations):
        swell = swell_ms / 1000
        add(out, s - swell, amp(db) * bubble(hz, swell_ms, glide + glide_spread * bend))
        # the neighbour of nearly the same size beats against the pop
        twin_hz = hz * 2 ** (twin_octaves * detune)
        add(out, s + swell * lag / 2, amp(db + twin_db) * bubble(twin_hz, swell_ms, 0))
        snap_hz = np.sqrt(hz * 3600)
        snap_s = snap_cycles / snap_hz
        add(out, s - snap_s, amp(db + snap_db) * bubble(snap_hz, 1000 * snap_s, 0))
    return out


def scene():
    """Pops, froth, swarms, crackle and sizzles in the pan, over the hum, the knock and the still air."""
    background = still_air() + hum() + kitchen(knock(), pan_db=-37, room_db=-14.0)
    steam = gurgles() + whistles() + sizzles()
    fine_simmer = gulps() * (small_bubbles() + tiny_bubbles() + crackle())
    simmer = kitchen(large_bubbles() + fine_simmer, pan_db=-2.5, room_db=-9)
    frothing = kitchen(froth() + spits(), pan_db=-3.0, room_db=-4.5)
    popping = kitchen(pops(), pan_db=-8.5, room_db=-9.5)
    return (background + steam + simmer + frothing + popping)[None]


def record(dry, edge_hz=15720):
    """Cuts off the treble above the edge with a steep filter."""
    lowpass = signal.firwin(511, edge_hz, window=("kaiser", 9), fs=SR)
    return signal.oaconvolve(dry, lowpass[None], "same")


dry = scene()
out = record(dry)
store_wav(out)
```